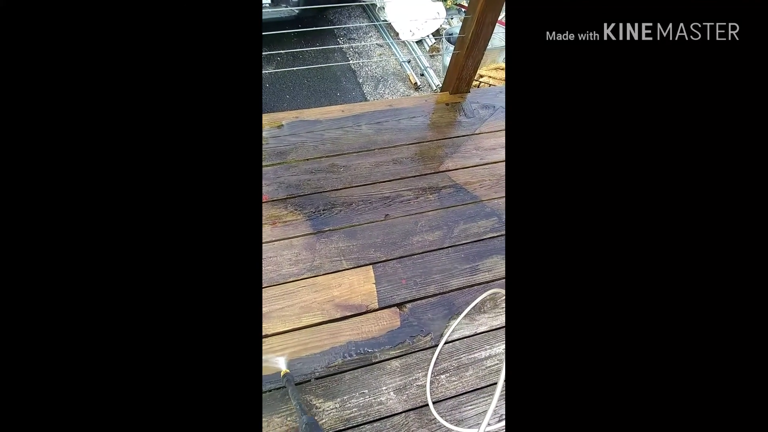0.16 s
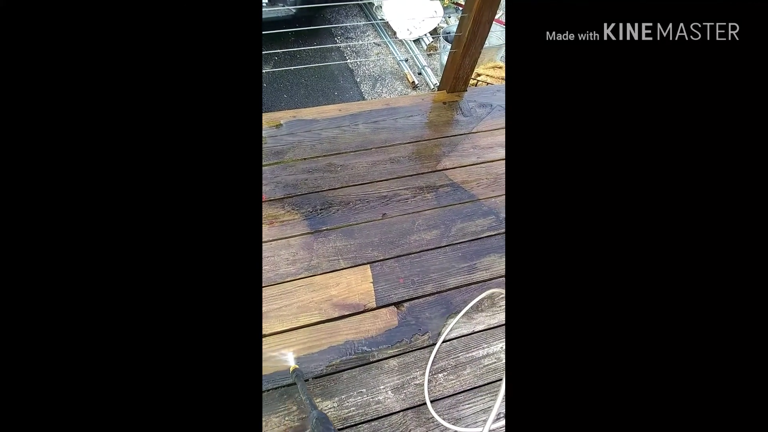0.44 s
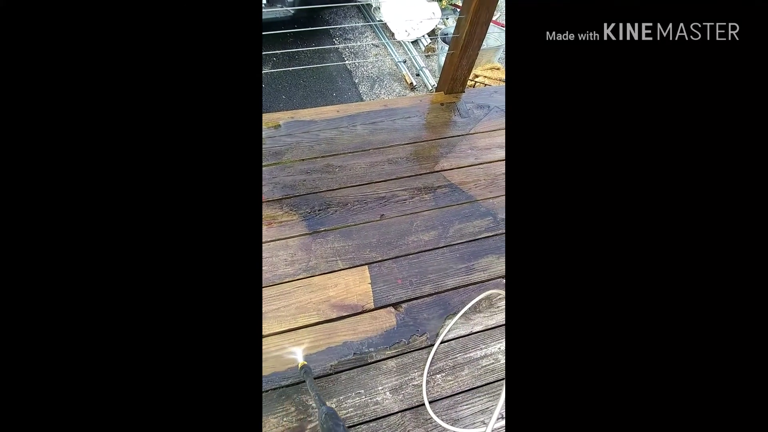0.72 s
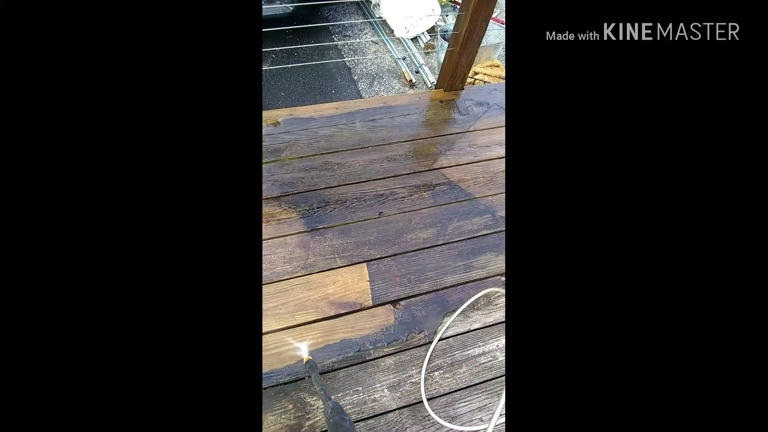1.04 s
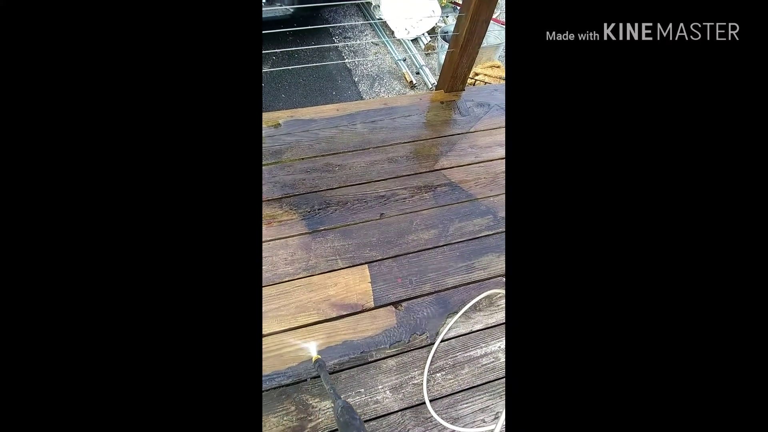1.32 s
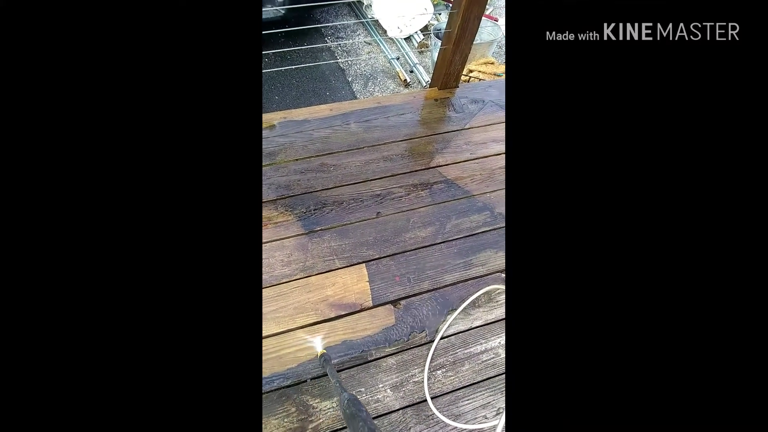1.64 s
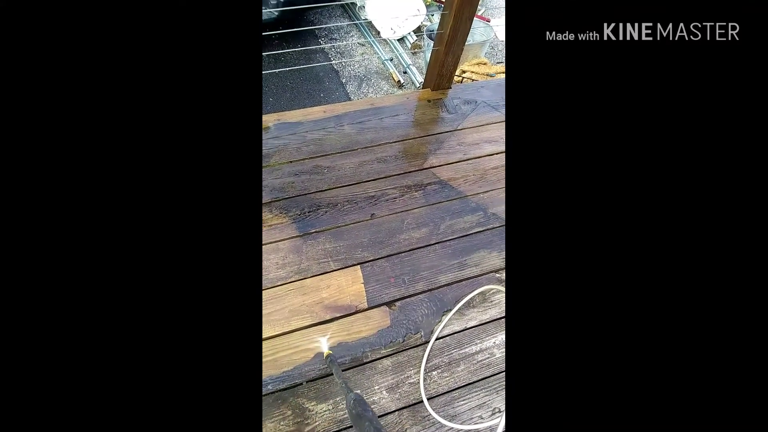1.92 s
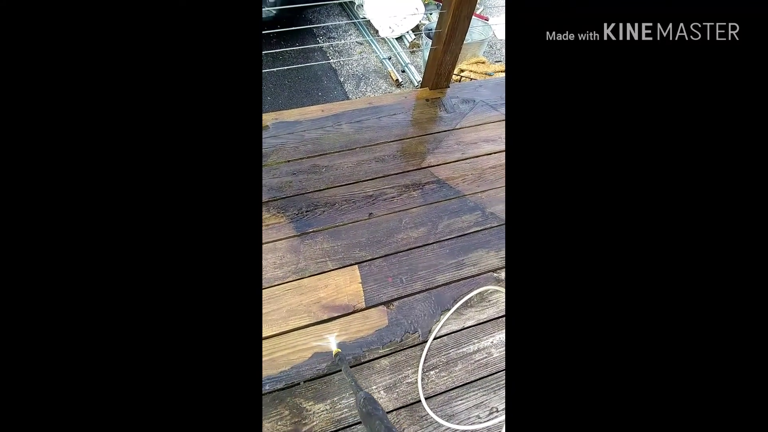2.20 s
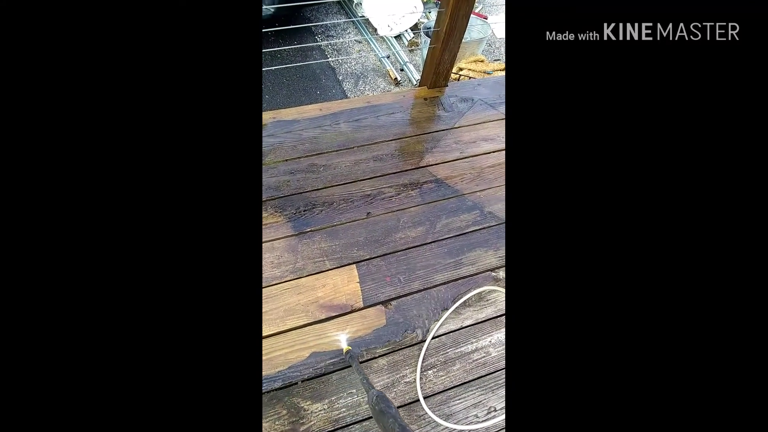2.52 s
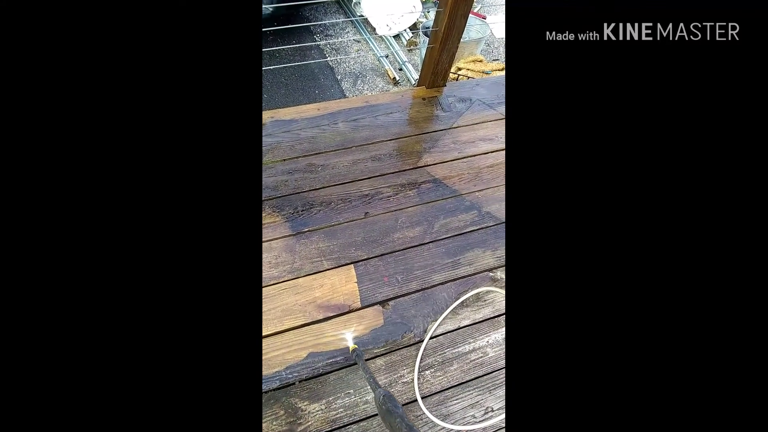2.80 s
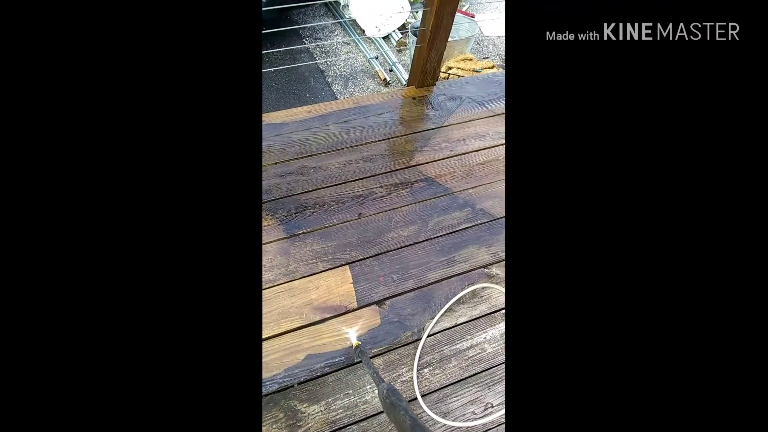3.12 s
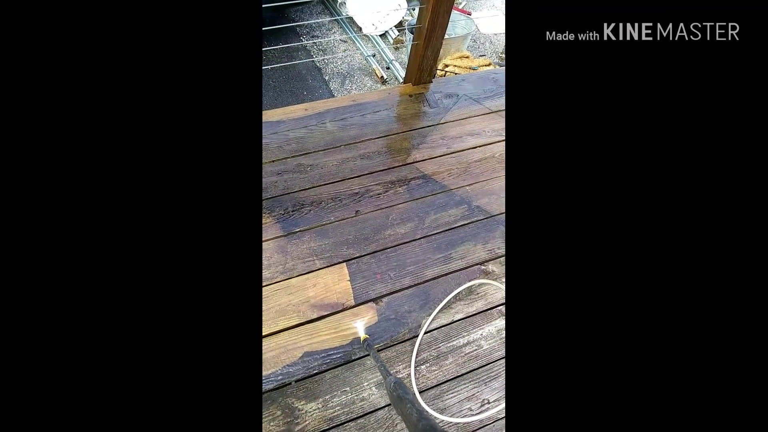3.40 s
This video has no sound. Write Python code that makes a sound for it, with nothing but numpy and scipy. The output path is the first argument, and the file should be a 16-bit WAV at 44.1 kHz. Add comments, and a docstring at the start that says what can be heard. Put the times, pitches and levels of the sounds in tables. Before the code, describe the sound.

A pressure washer sprays wooden deck boards outdoors, close and in stereo, continuously for about 3.5 seconds. The dense, bright hiss is grainy with tiny drop ticks and a rougher splash on wood. It shifts slightly, with brief surges near 0.3, 1.8 and 3.3 seconds. A steady low motor hum, soft pump buzz and thin gear whine continue beneath; a fuzzy high whistle emerges after about 1 second.

```python
"""Pressure washer on a wooden deck

An electric pressure washer cleans boards outdoors, heard from two close microphone ports.
The fan jet is shaped noise with ticking drops: it hisses at the nozzle and drums on the boards,
swelling and dipping as it sweeps along them, and a fuzzy high whistle rises inside the hiss.
Behind it, wavering tones locked to the turning shafts make the motor's hum, the throb and soft buzz
of the piston pump, and the whine of the gears."""
import sys
import numpy as np
from scipy import signal
from scipy.fft import rfft, irfft
from scipy.io import wavfile
from scipy.ndimage import uniform_filter1d

SR = 44100
rng = np.random.default_rng(int(sys.argv[2]) if len(sys.argv) > 2 else 0)


def materialize(psi):
    """Save the field psi as 16-bit PCM at rate SR to the path in sys.argv[1].

    A 1-D psi becomes a single channel; in a 2-D psi each row is a channel.
    """
    bounded = np.clip(np.atleast_2d(psi).T, -1, 1)
    quanta = np.round(bounded * 32767).astype(np.int16)
    wavfile.write(sys.argv[1], SR, quanta)


N = 156555
TIME = np.arange(N) / SR  # seconds
WINDOW, HOP = 1024, 256  # short-time spectra, in samples


def amp(db):
    """Decibels to gain."""
    return 10 ** (np.asarray(db) / 20)


def evened(x):
    """Scales to rms 1."""
    return x / np.sqrt(np.mean(x ** 2) + 1e-20)


def follow(table, at):
    """Every column of a table after the first, joined by straight lines."""
    first, *columns = np.transpose(table)
    return [np.interp(at, first, column) for column in columns]


def colour(points_hz, values, hz):
    """Reads a spectrum on a log-frequency axis."""
    return np.interp(np.log(hz + 1), np.log(points_hz), values)


def wander(rate_hz):
    """Smooth random motion of rms 1, fading out around the given rate."""
    hz = np.fft.rfftfreq(2 * N, 1 / SR)
    spectrum = rfft(rng.standard_normal(2 * N))
    return evened(irfft(spectrum * np.exp(-(hz / rate_hz) ** 2))[:N])


def blotches(shape, frames, bins):
    """Random field of rms 1, smoothed over so many frames and frequency bins."""
    field = uniform_filter1d(rng.standard_normal(shape), size=frames, axis=0)
    return evened(uniform_filter1d(field, size=bins, axis=1))


def drops(low_hz=1100, high_hz=11000, cycles=1.26, count=20):
    """Flung drops tick on the wet wood, each a very short damped ring at one of a few pitches."""
    drops_per_s, spread_db = 500, 1  # all pitches together; mean of the random boost per drop
    level_db = -13  # relative to the jet's noise
    out, t = np.zeros(N), np.arange(600) / SR
    for hz in np.geomspace(low_hz, high_hz, count):
        landed = rng.random(N) < drops_per_s / count / SR
        sizes = amp(spread_db * np.minimum(rng.exponential(1, N), 4)) * landed
        ring = np.sqrt(hz) * np.sin(2 * np.pi * hz * t) * np.exp(-t * hz / cycles)
        out += signal.oaconvolve(sizes, ring)[:N]
    return amp(level_db) * evened(out)


def jet(pump, ripple=0.043):
    """Short-time spectra of the water: noise and drop ticks, rippling twice per pump turn."""
    water = rng.standard_normal(N) + drops()
    water = water * (1 + ripple * np.cos(4 * np.pi * pump))
    return signal.stft(water, nperseg=WINDOW, noverlap=WINDOW - HOP)[2].T


def drift(frames, bins):
    """Reflections off the boards colour the treble with peaks and dips that shift as the lance moves."""
    drift_db, width_hz, lasting_s, above_hz = 1.18, 300, 0.495, 1700  # dB is rms, before the treble tilt
    along = max(round(lasting_s * SR / HOP), 1)
    across = max(round(width_hz * WINDOW / SR), 1)
    hz = np.linspace(0, SR / 2, bins)
    treble = hz ** 2 / (hz ** 2 + above_hz ** 2)
    return drift_db * blotches((frames, bins), along, across) * treble


def sweep_level(seconds, hz):
    """Moves of roar, splash and hiss in dB as the jet sweeps, cross-faded along the spectrum."""
    # Swells and dips of the jet. Each row: time in seconds, nozzle hiss, splash and roar of the
    # boards, all three as changes in dB.
    sweep = [(0.0, -1.5, -2.5, -1), (0.08, -0.5, .5, -0.5), (0.2, 1, 0.5, 1), (0.29, 0, 0, 3),
             (0.32, 0.5, 0.5, 1.5), (0.83, 1, 1, 0.5), (0.86, -1, -.5, 0), (1.2, .5, -0.8, 0.8),
             (1.58, -.5, -0.5, -1), (1.79, 0.5, 3.5, 2), (1.83, -0.5, -1, 0.5), (1.89, 2, 1, 0),
             (1.9, -2, -2.5, -2.5), (2.2, 1, 0.5, -.5), (2.31, -1, -2, -2.1), (2.54, 0, 0, -.5),
             (3.07, 1.5, -2.1, 0), (3.25, -1, 0.5, 1), (3.31, 2, 0.5, 2.3), (3.37, -2.3, 0.5, 0),
             (3.55, -2, -0.5, 0.5)]
    roar_top_hz, splash_hz, hiss_hz = 1790, 5400, 11100
    hiss, splash, roar = (column[:, None] for column in follow(sweep, seconds))
    low = colour([roar_top_hz, splash_hz], [1, 0], hz)
    high = colour([splash_hz, hiss_hz], [0, 1], hz)
    return low * roar + high * hiss + (1 - low - high) * splash


def matched_ports(left, other, seconds, hz):
    """The right port hears part of the left port's spray, shifted in phase, and part of its own."""
    # How alike the ports hear the spray; some bands arrive in opposite phase. Each row: frequency
    # in Hz, likeness from 0 to 1, lead of the left port in radians.
    ports = [(30, .7, 3.14), (60, .5, 2.3), (130, .63, 1), (250, .9, .3), (450, .63, -.7), (700, .93, .6),
             (1000, .99, 0), (1350, .96, 0), (1700, .6, -.2), (1950, .4, -.3), (2170, 1, 3.1416),
             (2770, 1, 3.1416), (3080, .2, 1.1), (3350, .95, .1), (3720, .85, 0), (4330, 1, 3.1416),
             (5200, 1, 3.1416), (5600, .35, .7), (6250, .2, -1.8), (6900, .48, -2), (7600, .3, -.6),
             (8250, .72, .3), (9200, .3, -.9), (10100, .68, .4), (10800, .65, 1.7), (11300, .55, -3),
             (11700, .65, -1.1), (12150, .96, 0), (12650, .68, .6), (13400, .35, 2.6), (14200, .3, 0)]
    sway_rad, sway_hz = 0.064, 18  # the phase between the ports sways a little as the lance moves
    port_hz, likeness, lead = np.transpose(ports)
    sway = sway_rad * np.interp(seconds, TIME, wander(sway_hz))[:, None]
    same = colour(port_hz, likeness * np.exp(-1j * lead), hz) * np.exp(1j * sway)
    own = np.sqrt(np.maximum(1 - abs(same) ** 2, 0))
    return np.array([left, same * left + own * other])


def spray(pump, patchy_db=1.13, flicker_db=0.65):
    """The jet's roar, splash and hiss: patchy turbulence that follows the sweep."""
    # Tone of the spray at each port. Each row: frequency in Hz, left and right density in
    # relative dB per Hz.
    spectrum = [(30, -30, -30), (99, -21, -21.5), (212, -12.5, -13), (320, -7, -13), (396, -6.5, -7),
                (496, -16, -13), (554, -14, -8), (797, -6, -7.5), (1100, -10, -10), (1350, -11, -11),
                (1490, -12, -9.5), (2020, -11.5, -10), (2160, -22.5, -22), (2520, -12, -12),
                (2630, -11, -10), (3100, -8.5, -10), (3430, -8, -8), (3900, -9.5, -6.5), (4560, -4.5, -4),
                (4900, -7.5, -7), (5240, -6.5, -7.5), (5850, -13, -7), (6760, -7.5, -5.5),
                (7650, -10, -4.5), (8700, -6, -7), (9400, -7, -6), (10000, -4.5, -3), (10500, -1, -1.5),
                (11200, 0, -3), (11600, 0, -8), (12100, 0, -1), (12430, -2, -1.5), (13030, -6.5, -7),
                (13800, -10.5, -9)]
    level_db = -21.5  # rms of both ports together
    left, other = jet(pump), jet(pump)
    hz = np.fft.rfftfreq(WINDOW, 1 / SR)
    seconds = np.arange(len(left)) * HOP / SR
    patches = patchy_db * blotches(left.shape, frames=7, bins=10)
    flicker = flicker_db * blotches(left.shape, frames=5, bins=160)
    moves = sweep_level(seconds, hz) + patches + flicker + drift(*left.shape)
    spray_hz, *sides = np.transpose(spectrum)
    tone = np.array([colour(spray_hz, side, hz) for side in sides])[:, None]
    both = matched_ports(left, other, seconds, hz) * amp(moves + tone)
    sound = signal.istft(both.swapaxes(1, 2), nperseg=WINDOW, noverlap=WINDOW - HOP)[1]
    return amp(level_db) * evened(sound[:, :N])


def nozzle():
    """A fuzzy whistle in the hiss: a narrow noise band whose pitch and level glide."""
    # Path of the whistling band. Each row: time in seconds, centre in Hz, left and right level in dB.
    whistle = [(0, 12400, -56, -55), (1.2, 12490, -45, -38), (2.1, 11900, -32, -33), (2.9, 12050, -35, -31),
               (3.55, 12050, -31, -38)]
    width_hz = 280  # reach of the noise to either side of the centre
    hz, *sides_db = follow(whistle, TIME)
    band = wander(width_hz) + 1j * wander(width_hz)
    carrier = np.exp(2j * np.pi * np.cumsum(hz) / SR)
    return amp(sides_db) * (band * carrier).real


def partial(turns, lead, waver, waver_hz):
    """One line of the machine at both ports, wavering in level and phase; lead of the left in radians."""
    wavering = 1 + waver * (wander(waver_hz) + 1j * wander(waver_hz))
    tone = np.exp(2j * np.pi * turns) * wavering
    return np.array([tone, tone * np.exp(-1j * lead)]).real * np.sqrt(2) / np.sqrt(1 + 2 * waver ** 2)


def motor_hum(motor):
    """Hum at whole multiples of the motor's turns."""
    # Hum lines. Each row: multiple of the motor speed, left and right level in dB before facing.
    lines = [(1, -37.3, -39.5), (2, -62, -57)]
    return sum(amp([[left_db], [right_db]]) * partial(round(k) * motor, lead=0.24, waver=0.12, waver_hz=24)
               for k, left_db, right_db in lines)


def piston_throb(pump, pistons=3):
    """Each piston pushes once per pump turn, giving one throbbing tone."""
    # Throb of the pistons. Each row: time in seconds, level in dB before facing.
    push = [(0, -49), (.6, -53), (1.2, -52), (3.55, -58)]
    tone = partial(pistons * pump + rng.random(), lead=0.11, waver=0.29, waver_hz=17)
    return amp(follow(push, TIME)[0]) * tone


def pump_buzz(pump):
    """A stack of strongly wavering multiples of the pump's turns."""
    # Buzz lines. Each row: multiple of the pump speed, level in dB relative to the overall trim.
    lines = [(5, -50.5), (6, -57), (7.53, -54), (9, -56), (11, -53), (12, -52), (13, -52.5), (14, -50),
             (15, -50), (16, -53), (17, -57), (18, -57), (19, -56.5), (20, -55), (22, -55)]
    trim_db = -1
    buzz = sum(amp(db) * partial(k * pump + rng.random(), lead=0.038, waver=0.46, waver_hz=5.1)
               for k, db in lines)
    return amp(trim_db) * buzz


def gear_whine(pump):
    """Meshing teeth whine at high multiples of the pump's turns."""
    # Whine lines. Each row: multiple of the pump speed, left and right level in dB before facing,
    # lead of the left port in radians.
    lines = [(50, -50.5, -48.5, 2.3), (95, -64, -61, 1), (96, -64, -61, 1), (97, -63, -60, 1),
             (98, -63, -58, 1), (99, -62, -56, 1), (100, -45.5, -37, .95), (101, -56, -50, .95),
             (102, -63, -57, 1), (103, -63, -60, 1)]
    return sum(amp([[left_db], [right_db]]) * partial(k * pump + rng.random(), lead, waver=0.16, waver_hz=24.8)
               for k, left_db, right_db, lead in lines)


def machine(motor, pump):
    """Hum, throb, buzz and whine, all locked to the turns of the motor and the pump."""
    # Facing: the machine's level as the ports turn away from it. Each row: time in seconds, gain in
    # dB of hum, throb and buzz together, then of the whine at left and right.
    facing = [(0, 0, 2, 6.5), (.5, 1.7, -24, 7), (1.1, 0.2, 1, 6), (1.65, 0.5, 0, 6.5), (2.2, -1, 7.5, 2.5),
              (2.9, 0.5, 9.5, 2.5), (3.55, 1, 9.5, -10)]
    body_gain, *whine_gains = amp(follow(facing, TIME))
    body = motor_hum(motor) + piston_throb(pump) + pump_buzz(pump)
    return body_gain * body + np.array(whine_gains) * gear_whine(pump)


def scene():
    """The motor drives the pump through a pair of gears; the pump feeds the jet."""
    # Motor speed. Each row: time in seconds, turns per second.
    speed = [(0, 265.7), (.4, 265.72), (.8, 266.08), (1.4, 266.14), (2.1, 266.08), (2.6, 266.17),
             (2.9, 266.0), (3.55, 266.15)]
    pinion_teeth, wheel_teeth = 11, 50
    motor = np.cumsum(follow(speed, TIME)[0]) / SR + rng.random()  # turns so far
    pump = motor * pinion_teeth / wheel_teeth
    return spray(pump) + nozzle() + machine(motor, pump)


def record(dry):
    """The recorder's band limit: a steep low-pass."""
    edge_hz = 14270
    lowpass = signal.firwin(1601, edge_hz, window=("kaiser", 9), fs=SR)
    return signal.oaconvolve(dry, lowpass[None], "same")


dry = scene()
out = record(dry)
materialize(out)
```